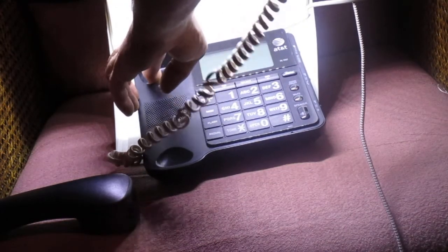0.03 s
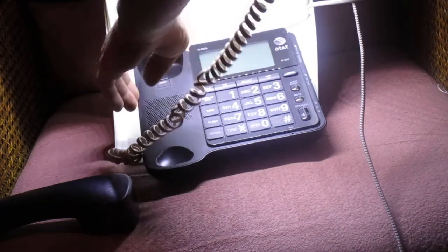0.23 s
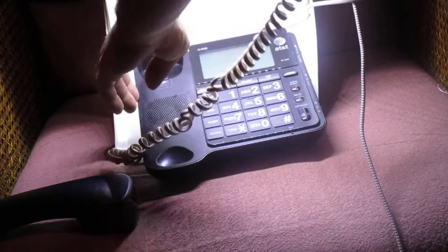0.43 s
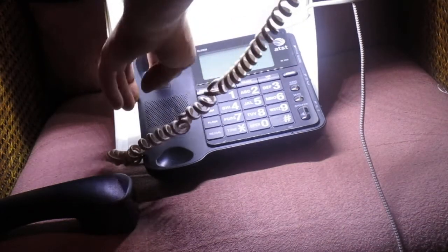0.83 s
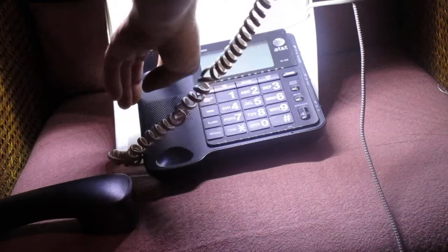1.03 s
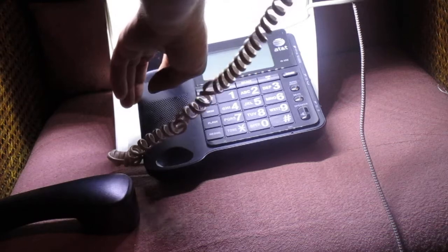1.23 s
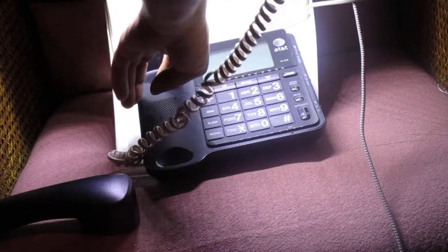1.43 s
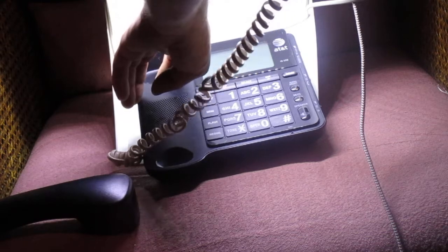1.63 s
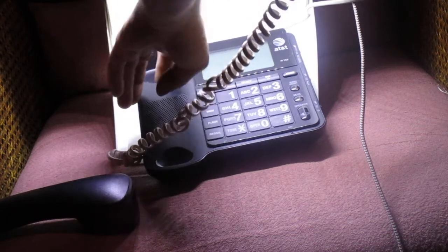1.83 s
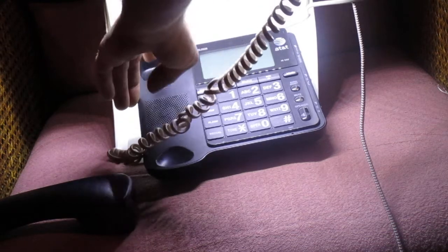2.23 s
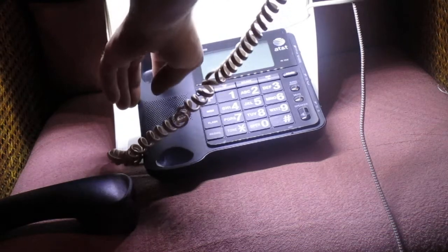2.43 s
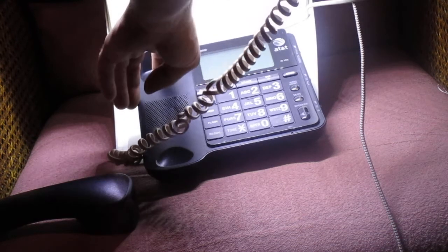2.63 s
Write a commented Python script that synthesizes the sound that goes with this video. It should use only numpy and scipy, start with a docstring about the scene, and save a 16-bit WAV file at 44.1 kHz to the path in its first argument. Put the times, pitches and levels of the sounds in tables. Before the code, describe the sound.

Sharp plastic clicks of a telephone hook switch, pressed and released twice in a quiet room.

```python
"""Hook switch of a desk phone

A finger works the plastic hook switch of a phone that sits on an armchair in a small room. Twice the
lever is pushed against its stop and springs back. Each click is a few quick impacts that excite the
housing: a dense crack and a set of damped modes. After each release the hand softly nudges the case.
Behind it are room rumble, hiss, a faint narrow tone and a thin electronic whine."""
import sys
import numpy as np
from scipy import signal
from scipy.fft import rfft, irfft
from scipy.io import wavfile

SR = 44100
rng = np.random.default_rng(int(sys.argv[2]) if len(sys.argv) > 2 else 0)


def store_pcm(level_fs):
    """Save levels as 16-bit WAV."""
    pcm = np.round(np.clip(level_fs, -1, 1) * 32767).astype(np.int16)
    wavfile.write(sys.argv[1], SR, np.atleast_2d(pcm).T)


N = 119070
RING_TIME_S = np.arange(int(0.3 * SR)) / SR

# normal modes of housing and lever: pitch_hz, t60_s, pressed_db, released_db
MODES = [(265, 0.058, -46, -45), (400, .06, -36, -52), (627, .05, -37, -61), (820, .12, -40, -40),
         (898, 0.13, -37.5, -38.5), (1206, 0.031, -21.5, -31), (1350, 0.048, -49, -36.5),
         (1505, 0.044, -24.5, -29.5), (1675, 0.046, -22, -53), (1873, .06, -15.5, -38),
         (2000, 0.055, -26, -29), (2234, 0.048, -24, -28.5), (2790, 0.037, -18.5, -37),
         (2940, 0.032, -14.5, -32.5), (3530, 0.028, -46, -34), (3820, .03, -20, -36),
         (3937, 0.017, -8.5, -49), (4610, 0.027, -17, -40), (5230, 0.033, -14, -26),
         (5534, .03, -18, -27.5), (7665, 0.037, -25, -55)]


def from_db(db):
    """Amplitude grows tenfold for every 20 dB."""
    return 10 ** (np.asarray(db) / 20)


def unit_rms(x):
    """Normalisation to a mean power of one."""
    return x / np.sqrt(np.mean(x ** 2) + 1e-20)


def at_hz(points, hz):
    """Interpolation on a logarithmic frequency axis."""
    pitches_hz, values = np.transpose(points)
    return np.interp(np.log(hz + 1e-9), np.log(pitches_hz), values)


def decay(t60_s):
    """Exponential damping: the level falls 60 dB in t60_s."""
    return np.exp(-np.log(1000) * RING_TIME_S / t60_s)


def shaped_noise(spectrum):
    """Spectral filtering colours white noise; the result has unit power."""
    return unit_rms(irfft(rfft(rng.standard_normal(N)) * spectrum, N))


def dying_noise(db_of_hz, t60_of_hz, onset=1):
    """Modal overlap: crowded resonances act as noise bands, each with its own energy and decay."""
    edges_hz = np.geomspace(70, 17000, 21)
    out = 0
    for low, high in zip(edges_hz, edges_hz[1:]):
        centre_hz = np.sqrt(low * high)
        band_pass = signal.butter(2, (low, high), "band", fs=SR, output="sos")
        burst = rng.standard_normal(len(RING_TIME_S)) * onset * decay(t60_of_hz(centre_hz))
        band = unit_rms(signal.sosfilt(band_pass, burst))
        width_gain = np.sqrt(2 * (high - low) / SR / len(band))  # energy in proportion to bandwidth
        out = out + from_db(db_of_hz(centre_hz)) * width_gain * band
    return out


def background():
    """Noise floor: broadband rumble and hiss, a narrowband tone and a frequency-modulated whine."""
    # relative spectral density of the room noise: pitch_hz, level_db
    noise_spectrum = [(20, -4), (35, 1), (52, -2.5), (95, -2.5), (150, -4.5), (220, -5.5), (350, -10),
                      (620, -13), (1100, -12), (1400, -16.5), (2200, -20.5), (3000, -22), (3900, -25.5),
                      (7000, -27), (11500, -32), (15000, -38.5)]
    # slow drift of its overall level: time_s, level_db
    noise_levels = [(0, -52), (.19, -52), (.35, -54.5), (.6, -53), (.9, -51.5), (1.9, -52), (2.1, -52),
                    (2.7, -51.5)]
    tone_hz, tone_width_hz, tone_db = 944, 25, -75.5
    whine_hz, wander_hz, whine_db = 12000, 6.0, -79.5
    hz = np.arange(N // 2 + 1) * SR / N
    level_db = np.interp(np.arange(N) / SR, *np.transpose(noise_levels))
    rumble_and_hiss = from_db(level_db) * shaped_noise(from_db(at_hz(noise_spectrum, hz)) * (hz > 10))
    tone = from_db(tone_db) * shaped_noise(1 / (1 + (2 * (hz - tone_hz) / tone_width_hz) ** 2))
    pitch_hz = whine_hz + wander_hz * shaped_noise(hz < 20)
    whine = from_db(whine_db) * np.sqrt(2) * np.sin(2 * np.pi * np.cumsum(pitch_hz) / SR)
    return rumble_and_hiss + tone + whine


def room(x):
    """Reverberation: convolution with the short diffuse tail of a furnished room."""
    # level of the tail relative to the sound that excites it: pitch_hz, level_db
    tail_levels = [(200, -11), (700, -4.5), (2000, -12.5), (5000, -13.5), (12000, -11.5)]
    # reverberation time: pitch_hz, t60_s
    tail_t60 = [(200, 0.17), (2000, 0.18), (5000, 0.2), (12000, 0.11)]
    delay_s, build_s = 0.0051, 0.004
    onset = np.clip((RING_TIME_S - delay_s) / build_s, 0, 1)
    tail = dying_noise(lambda hz: at_hz(tail_levels, hz), lambda hz: at_hz(tail_t60, hz), onset)
    return signal.fftconvolve(x, tail)[:N]


def hand_nudges():
    """Soft impact: the hand excites mainly the low frequencies of the case, giving dull bumps."""
    # bumps on the case: start_s, level_db
    bumps = [(1.079, 0.5), (2.657, 0.5)]
    # spectral density of a bump: pitch_hz, level_db
    bump_spectrum = [(80, 2), (250, -6.5), (600, -7.5), (1200, -28), (3000, -32), (12000, -51)]
    t60_s = 0.078
    out = np.zeros(N)
    for start_s, level_db in bumps:
        add(out, start_s, dying_noise(lambda hz: level_db + at_hz(bump_spectrum, hz), lambda hz: t60_s))
    return out


def add(out, start_s, sound):
    """Superposition: a sound adds to the mix from start_s on."""
    i = int(start_s * SR)
    out[i:i + len(sound)] += sound[:len(out) - i]


def contact_colour(hz, body_db, knock_db, treble_db):
    """Excitation spectrum in dB: where and how hard the lever lands weights three frequency regions."""
    bell = lambda centre_hz, octaves: np.exp(-0.5 * (np.log2(hz / centre_hz) / octaves) ** 2)
    hollow_body = body_db * bell(centre_hz=760, octaves=0.67)
    plastic_knock = knock_db * bell(centre_hz=1770, octaves=0.17)
    bright_edge = treble_db / (1 + (2970 / hz) ** 4)  # shelf above 2970 Hz
    return hollow_body + plastic_knock + bright_edge


def lever_clicks(clicks, mode_levels_db, crack_spectrum):
    """Contact chatter: quick impacts crack while the housing's modes build up; returns (rings, cracks)."""
    # decay time of the plastic's dense crack: pitch_hz, t60_s
    crack_t60 = [(200, 0.2), (1000, 0.013), (4000, 0.02), (14000, 0.024)]
    contact_count, rise_share = 3, 0.15
    rings, cracks = np.zeros(N), np.zeros(N)
    for start_s, level_db, body_db, knock_db, treble_db, ring_db, chatter_s, loss_db in clicks:
        strike_db = lambda hz: level_db + contact_colour(hz, body_db, knock_db, treble_db)
        crack_db = lambda hz: at_hz(crack_spectrum, hz) + strike_db(hz)
        for k, delay_s in enumerate(np.linspace(0, chatter_s, contact_count)):
            contact = dying_noise(crack_db, lambda hz: at_hz(crack_t60, hz))
            add(cracks, start_s + delay_s, from_db(-k * loss_db) * contact)
        rise = 1 - np.exp(-RING_TIME_S / (rise_share * chatter_s))
        for (hz, t60_s, _, _), mode_db in zip(MODES, mode_levels_db):
            swing = np.sin(2 * np.pi * (hz * RING_TIME_S + rng.random())) * rise * decay(t60_s)
            add(rings, start_s, from_db(mode_db + ring_db + strike_db(hz)) * swing)
    return np.array([rings, cracks])


def hook_switch():
    """Impact excitation: pressing and releasing drive the same modes with different strengths."""
    # clicks as the lever goes down:
    # start_s, level_db, body_db, knock_db, treble_db, ring_db, chatter_s, loss_per_contact_db
    presses = [(0.194, -34.5, 3, -2, -1, 2, 0.0049, 0), (0.203, -24, 14, 3, -13, -19, .004, 1),
               (0.2103, 0, 1.5, -2, 2, 0.5, .005, 5.5), (1.916, -35, 12, -4, -11, 2, 0.0043, 1),
               (1.9265, -23, 10.5, -2, -6, 0, 0.0033, 0.5), (1.9459, -8, 4.5, 3, -3.5, 2, .0055, 0),
               (1.968, -19, 5, 1.5, -3, -2, .006, 4.5)]
    # clicks as it springs back: same columns
    releases = [(0.6481, 1.5, -6.5, 6, -3, 0, .0075, 3.5), (2.4098, -3.5, 4, -4, 3, 0, .0085, 0.5)]
    # spectral density of the crack on pressing: pitch_hz, level_db
    press_crack = [(200, -9.5), (450, -1), (1000, 2), (1600, 16.5), (2600, 14.5), (4400, 13), (6500, 6),
                   (10000, 4.5), (15000, -13.5)]
    # spectral density of the crack on release: pitch_hz, level_db
    release_crack = [(200, -1.5), (450, -1), (1000, -6.5), (1600, 2), (2600, -2), (4400, 3), (6500, -15),
                     (10000, -15.5), (15000, -23)]
    _, _, pressed_db, released_db = np.transpose(MODES)
    down = lever_clicks(presses, pressed_db, press_crack)
    up = lever_clicks(releases, released_db, release_crack)
    return down + up


def scene():
    """Direct sound, reverberation and noise floor superpose in mono."""
    rings, cracks = hook_switch()
    knocks = cracks + hand_nudges()
    # the near panels' modes carry less into the room than the crack
    reverberation = room(knocks + from_db(-6.5) * rings)
    return (rings + knocks + reverberation + background())[None]


def record(dry):
    """Soft saturation rounds the highest peaks; a steep low-pass cuts the top."""
    cutoff_hz = 15100
    low_pass = signal.ellip(10, 0.1, 80, cutoff_hz, fs=SR, output="sos")
    return signal.sosfilt(low_pass, np.tanh(dry))


dry = scene()
out = record(dry)
store_pcm(out)
```